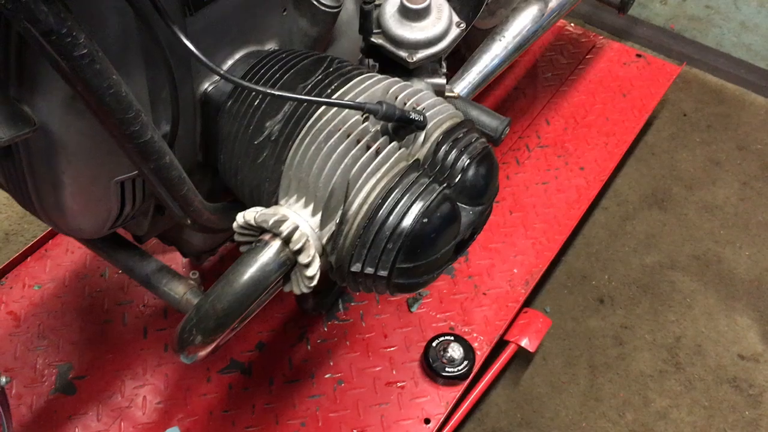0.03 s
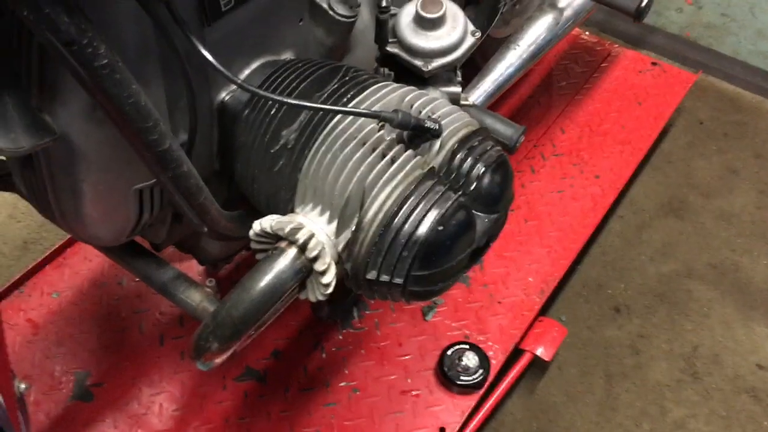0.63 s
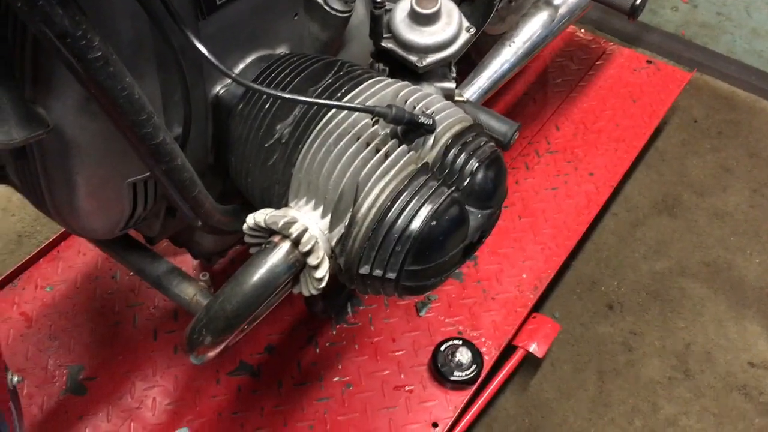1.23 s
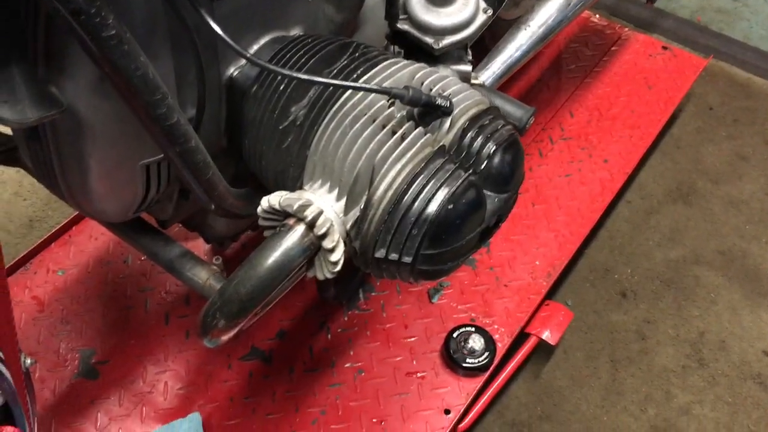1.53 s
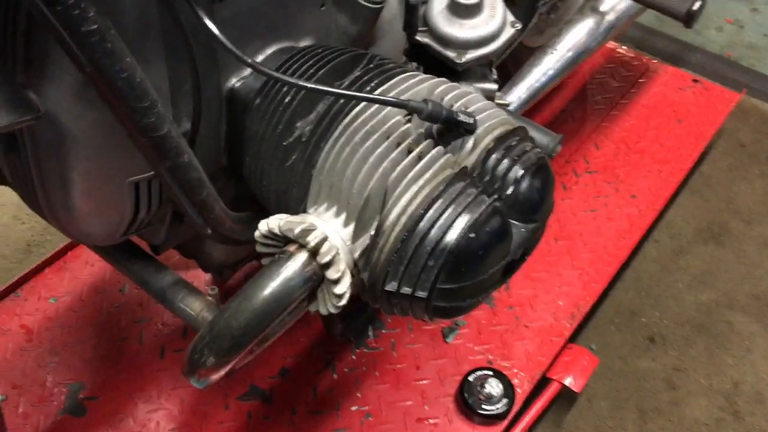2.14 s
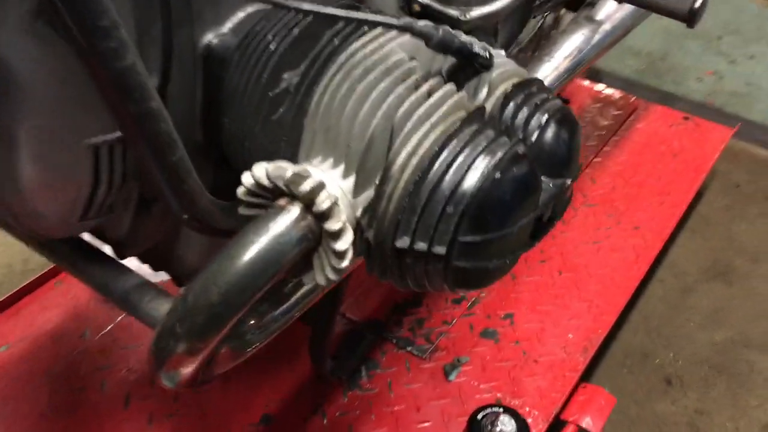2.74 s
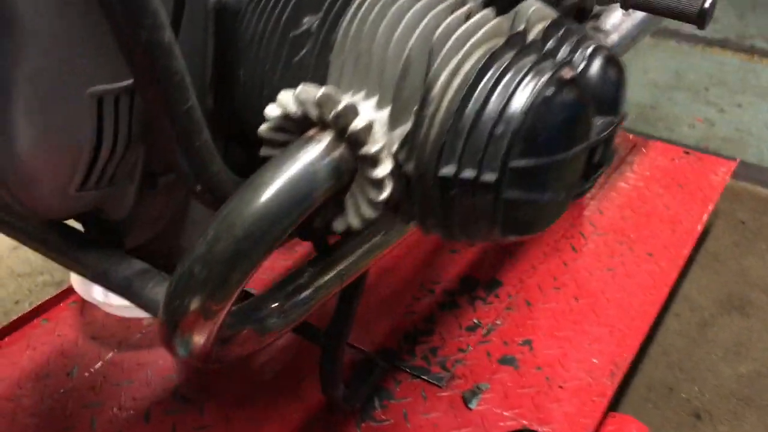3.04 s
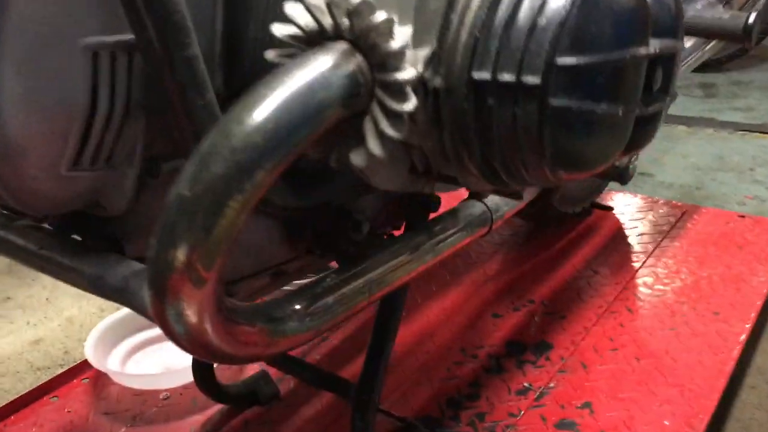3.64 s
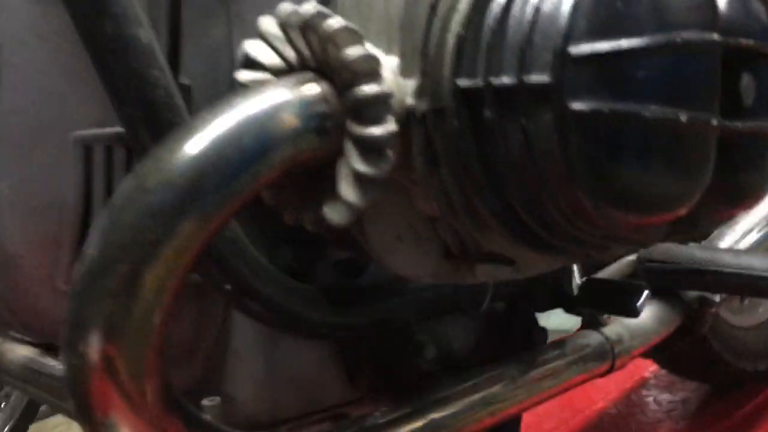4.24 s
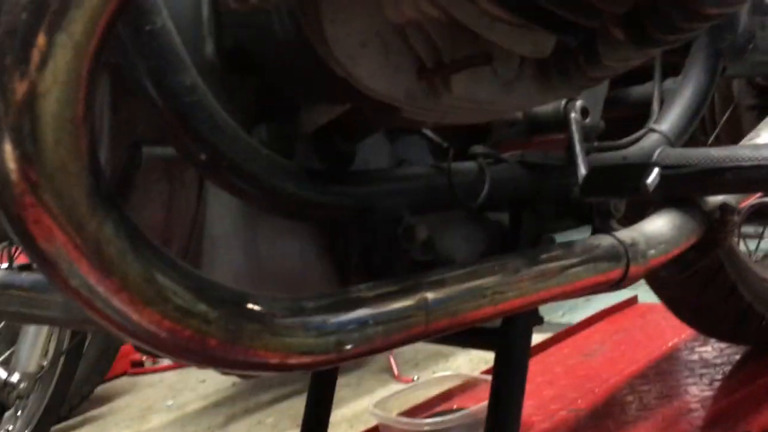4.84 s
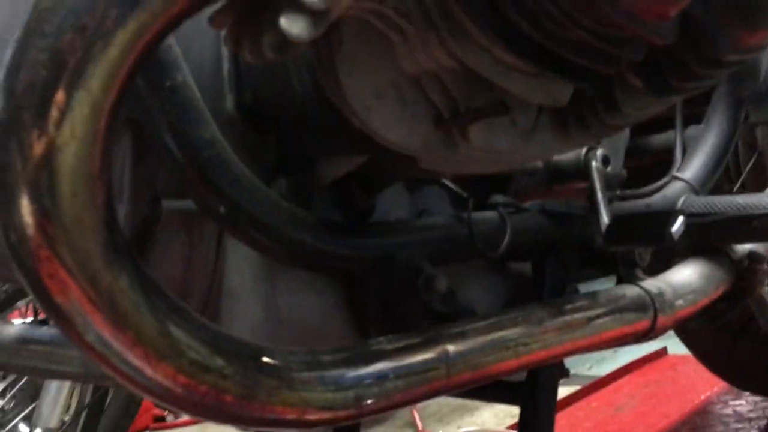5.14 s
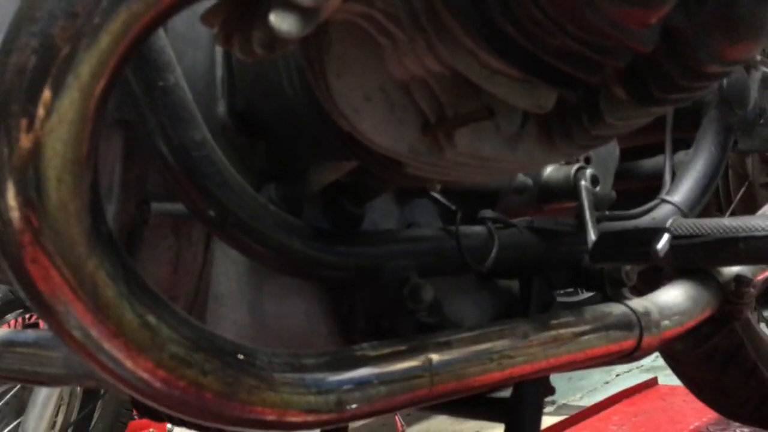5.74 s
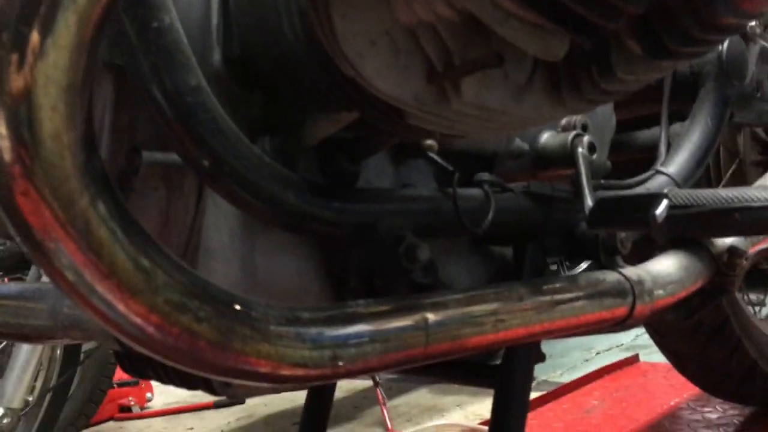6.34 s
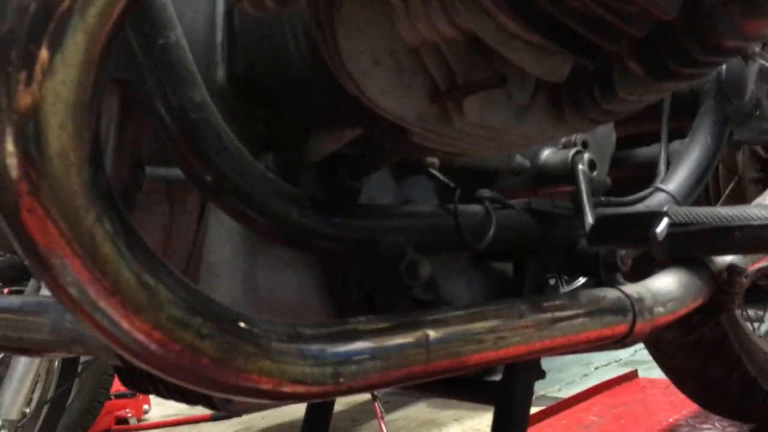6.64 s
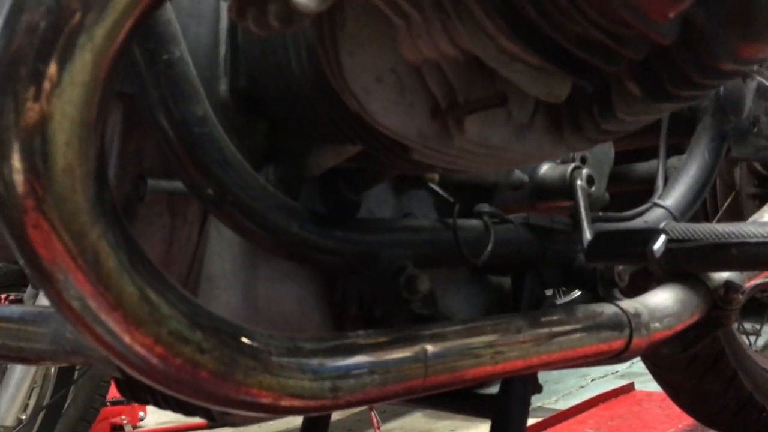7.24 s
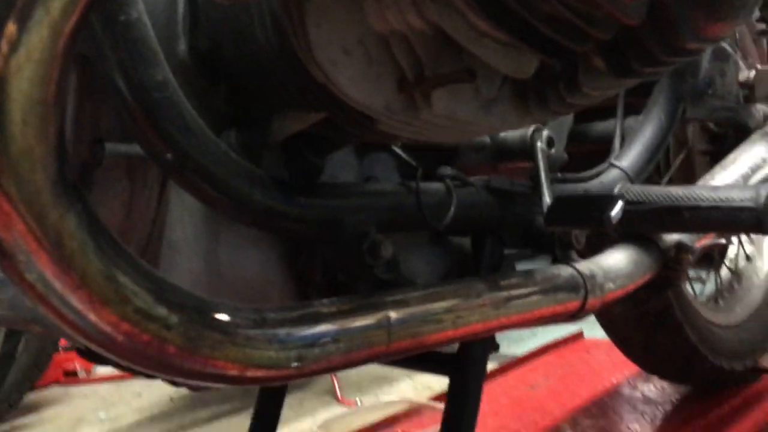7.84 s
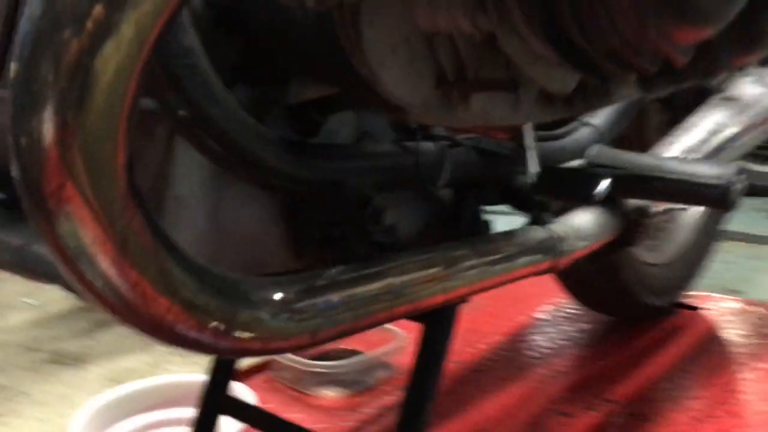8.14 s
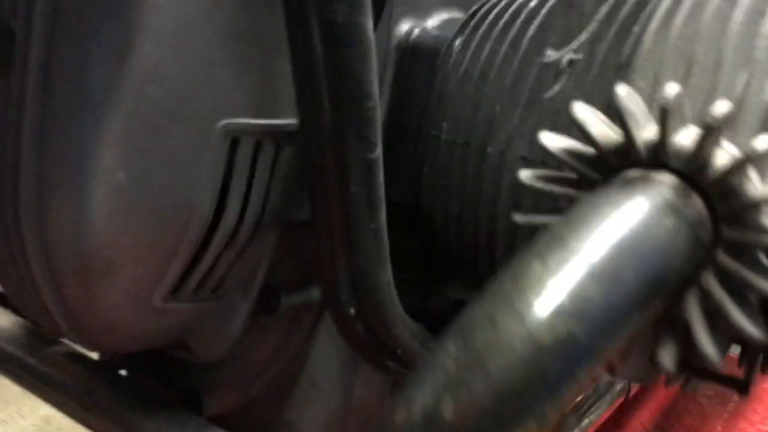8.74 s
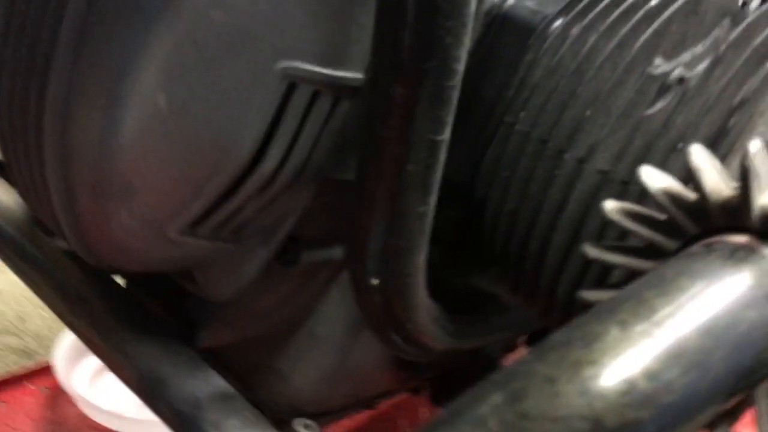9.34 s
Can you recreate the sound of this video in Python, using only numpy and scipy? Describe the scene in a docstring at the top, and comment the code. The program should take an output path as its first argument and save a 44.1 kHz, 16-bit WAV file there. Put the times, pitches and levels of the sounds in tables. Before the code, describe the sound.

A twin-cylinder motorcycle engine is already idling at the start, heard close up in a workshop, and it runs without a break for about nine seconds. A loose tappet gives a sharp steel tick about eleven times a second, each one briefly ringing the cylinder head and valve cover. Underneath are a low, even exhaust throb with soft puttering, short hollow knocks in step with it, a whirr of gears and chain, and a faint hiss of air. The idle speed wavers only slightly and never revs.

Around 3 seconds the microphone moves beside the cylinder, and the ringing changes colour and grows a little louder. From about 4.5 to 8 seconds it sits below, where the exhaust throb is slightly fuller. Near 8.5 seconds it moves to the front, and the metallic ticking and whirr become a bit stronger until the end.

```python
"""A workshop, close to a flat-twin motorcycle idling on a lift; a hand-held microphone moves round one
cylinder: above, beside, below, in front. A loose tappet ticks once in every four-stroke cycle and
rings the finned head; the other tappets are a faint wash. Two firings a cycle throb in the exhaust,
the crankcase knocks in step, and gears and chain whirr underneath."""
import sys
import numpy as np
from scipy import signal
from scipy.fft import rfft, irfft, next_fast_len
from scipy.io import wavfile

SR = 44100
rng = np.random.default_rng(int(sys.argv[2]) if len(sys.argv) > 2 else 0)


def transcribe(u):
    """Save the signal u as a 16-bit wav file named by the first command-line argument.

    u: samples, shape (n,) or (channels, n), limited to [-1, 1]; the rate is SR.
    q: integer samples, one column per channel.
    """
    v = np.clip(np.atleast_2d(u).T, -1, 1)
    q = np.round(v * 32767).astype(np.int16)
    wavfile.write(sys.argv[1], SR, q)


N = 413658
TIME = np.arange(N) / SR
AGE = np.arange(SR // 4) / SR  # seconds since a blow
FFT_SIZE = next_fast_len(N + SR // 2, True)
HZ = np.fft.rfftfreq(FFT_SIZE, 1 / SR)

# microphone path round the cylinder: t/s, position (0 above, 1 beside, 2 below, 3 in front)
MIC_PATH = [(0, 0), (2.6, 0), (3.05, 1), (4.35, 1), (4.7, 2), (8.15, 2), (8.8, 3), (9.38, 3)]


def loose_tappet(head_db, click_db):
    """Once a cycle the rocker slaps its valve: a steel click, the ring of the head, the room's answer."""
    # spectra of the contact, the click and the finned head: f/Hz, relative level/dB
    crack_spectrum = [(3000, -15.5), (7000, -12.5), (8500, 2), (12000, -0.5), (13500, -11), (15800, -6.5)]
    click_spectrum = [(1500, -30), (3800, -6), (6000, -1.5), (7600, -4.5), (8800, -1.5), (11000, -2),
                      (12200, -8), (13000, -5.5), (15800, -11.5)]
    head_spectrum = [(150, -35), (500, -22.5), (1250, 1.5), (1700, 4.5), (2100, 7.5), (2800, 4.5),
                     (3500, 9), (3900, -15.5), (6000, -23)]
    times = crank_times(0)
    db = np.interp(times, TIME, click_db) + 0.5 * rng.standard_normal(len(times))  # no two slaps are equal
    crack = blows(times, db + 6, attack=0.0005, t60=0.025, alike=0.94, scatter_db=0)
    click = blows(times, db + 3.5, attack=0.0021, t60=0.035, alike=0.8, scatter_db=-1.2)
    room = blows(times, db - 6.5, attack=0.00068, t60=0.2, alike=0.86, scatter_db=-1)
    head = blows(times, 0, attack=0.0014, t60=0.054, alike=0.53, scatter_db=1)
    head += blows(times, -4.5, attack=0.011, t60=0.24, alike=0.97, scatter_db=1.5)
    head = amp(head_db - 8.5) * unit(ring(head, shape(head_spectrum)))
    return ring(crack, shape(crack_spectrum)) + ring(click + room, shape(click_spectrum)) + head


def rocker_cover():
    """Every tick sets the valve cover and fins pinging and the steel rocker and valve stem chinking."""
    # modes of cover and rocker: f/Hz, swell/s, peak level/dB from above, beside, below, in front
    cover_modes = [(1768.1, 0.0012, -25.5, -28.5, -23.0, -23.0),
                   (2157.3, 0.0066, -37.5, -36.5, -35.5, -32.5),
                   (2203.6, 0.006, -36.5, -33.0, -36.5, -34.0),
                   (2268.8, 0.0025, -29.0, -23.0, -29.5, -33.0),
                   (2429.9, 0.0068, -34.5, -34.0, -35.5, -32.5),
                   (2651.0, 0.0024, -50.0, -26.0, -23.0, -24.5),
                   (2775.3, 0.0032, -33.5, -29.5, -29.0, -31.5),
                   (2816.1, 0.008, -39.5, -36.0, -34.0, -32.0),
                   (3143.0, 0.0045, -34.0, -27.0, -26.5, -26.0),
                   (3347.3, 0.0046, -26.0, -27.0, -48.0, -20.5),
                   (3438.8, 0.008, -42.5, -35.5, -36.0, -50.0),
                   (3505.5, 0.0022, -29.5, -45.5, -30.0, -50.0),
                   (3586.4, 0.008, -44.0, -43.0, -36.0, -50.0), (3673.6, 0.007, -38.5, -36.5, -48.5, -29.0)]
    rocker_modes = [(4444, 0.0047, -37, -47.5, -37.5, -40), (6350, 0.0037, -38, -35, -37, -35.5),
                    (8320, 0.0019, -48, -33, -33, -29), (8680, 0.0028, -34, -34.5, -45, -36),
                    (9760, 0.0033, -31.5, -32, -43, -31), (10040, 0.0032, -37, -37, -29, -37),
                    (10540, 0.0032, -46, -32, -38, -40), (11100, 0.0033, -31, -33, -35, -38),
                    (11790, 0.002, -46, -30, -37, -28)]
    times = crank_times(0) + 0.0005
    ping = sum(struck(times, hz, swell, mic_db, steep=0.88, scatter_db=1.06, detune=0.0015)
               for hz, swell, *mic_db in cover_modes)
    chink = sum(struck(times, hz, swell, mic_db, steep=0.49, scatter_db=2.5, detune=0.001)
                for hz, swell, *mic_db in rocker_modes)
    return ping + chink


def exhaust(exhaust_db):
    """Two cylinders fire in turn; the pipes pass only low, even multiples of the cycle rate."""
    # boom of the pipes: multiple of the cycle rate, relative level/dB
    harmonics = [(4, -16.5), (6, -3.5), (8, 2.5), (10, -11.5), (12, -26)]
    phase = cycles() + 0.1156  # runs a little ahead of the tick
    boom = -sum(amp(db) * np.cos(2 * np.pi * order * phase) for order, db in harmonics)
    burns = crank_times(0.17)
    burn_db = np.interp(TIME, burns, 0.43 * rng.standard_normal(len(burns)))  # no two cycles burn alike
    return amp(exhaust_db + burn_db) * unit(boom)


def putter():
    """Each cylinder's gas pulse and its echo puff softly in the silencers."""
    # puffs: share of cycle after the tick, f/Hz, swell/s, peak level/dB at the four microphone positions
    puffs = [(0.2174, 146.2, 0.0093, -26.5, -26, -23.5, -25), (0.267, 153, 0.0074, -26, -49.5, -58, -37),
             (0.3793, 210, 0.011, -35, -32, -29.5, -30.5), (0.6673, 182.3, 0.015, -30, -37, -31, -34),
             (0.867, 141.3, 0.008, -27, -22, -18.5, -21.5), (0.9206, 148.5, 0.0058, -24, -27, -21, -29.0)]
    return sum(struck(crank_times(share), hz, swell, mic_db, steep=2.6, scatter_db=0.5, detune=0.0057)
               for share, hz, swell, *mic_db in puffs)


def crankcase():
    """Pistons, gears and chain give short hollow knocks at the same crank angles in every cycle."""
    # knocks: share of cycle after the tick, f/Hz, swell/s, peak level/dB at the four microphone positions
    knocks = [(0.0048, 340, 0.0044, -31, -29, -29.5, -31), (0.0306, 845, 0.009, -41, -40, -34.5, -30),
              (0.0733, 607, 0.0026, -23.5, -26, -21.5, -32), (0.1126, 956, 0.0038, -49, -27, -38, -27),
              (0.184, 1150, 0.0043, -31, -31, -35.5, -36), (0.25, 726.3, 0.0044, -29, -36.0, -35, -36),
              (0.2802, 599, 0.0065, -33, -23.5, -26.5, -23.5),
              (0.2824, 394, 0.0039, -27.5, -30, -32.5, -26.5), (0.4015, 781, 0.016, -43, -29.5, -48, -34),
              (0.4397, 1162, 0.0041, -45, -32.5, -44, -38), (0.5637, 603, 0.0093, -27, -29.5, -35, -31),
              (0.639, 828, 0.0077, -38, -30, -27.5, -26), (0.6386, 525, 0.0057, -27.5, -36.5, -59, -33),
              (0.67, 562.6, 0.0084, -48, -22.5, -28, -21), (0.7161, 495.8, 0.0049, -42, -26, -28.5, -34.0),
              (0.7264, 642, 0.0024, -58, -21, -21, -25), (0.7368, 1135, 0.0043, -32, -22.5, -32.5, -19),
              (0.8424, 547.5, 0.0022, -22, -19, -21.5, -14.5),
              (0.8517, 618, 0.0068, -27.5, -28.5, -27.5, -38), (0.8564, 811, 0.0066, -32, -35, -31.5, -45),
              (0.8844, 1075, 0.0069, -28.5, -38, -32, -45), (0.955, 1172, 0.0032, -27.5, -33.5, -25, -28)]
    return sum(struck(crank_times(share), hz, swell, mic_db, steep=2.56, scatter_db=0.43, detune=0.0021)
               for share, hz, swell, *mic_db in knocks)


def gear_whirr(gears_db):
    """The same gear teeth and chain links mesh in every cycle, so their rush nearly repeats."""
    # rush of gears and chain: f/Hz, relative level/dB
    spectrum = [(20, -47), (60, -11), (200, -1), (265, 2.5), (330, 8.5), (450, 5.5), (600, 7), (800, 5.5),
                (1200, 4), (1600, 1), (2500, -3), (3400, -8), (4500, -15), (9000, -26), (15000, -35)]
    times = crank_times(0)
    cycle_s = np.mean(np.diff(times))
    swell = np.sin(np.pi * np.minimum(AGE / (2 * cycle_s), 1))  # overlapping cycles join evenly
    mesh = place(times, swell * dense_modes(len(times), alike=0.78))
    return amp(gears_db - 4) * ring(mesh, shape(spectrum))


def far_tappets(head_db):
    """The other valves close later in the cycle, hidden by the engine and blurred by the room."""
    # wash of the far tappets: f/Hz, relative level/dB
    spectrum = [(500, 3.5), (1800, 12), (2700, 16), (3500, 12.5), (4000, 5), (7500, -1), (9800, 9.5),
                (11200, 5), (13000, 1.5), (15800, 0)]
    wash = blows(crank_times(0.515), 0, attack=0.0034, t60=0.12, alike=0.95, scatter_db=-1)
    wash += blows(crank_times(0.75), -1.5, attack=0.0011, t60=0.024, alike=0.55, scatter_db=3)
    return amp(head_db - 12) * unit(ring(wash, shape(spectrum)))


def room_tone():
    """Intake air and the diffuse sound of the workshop make a steady hiss."""
    # air and room: f/Hz, relative level/dB
    spectrum = [(20, -8), (45, 13.5), (100, 10.5), (300, -8), (1500, -1.5), (3400, -5), (4000, -6),
                (7500, -10.5), (10000, -11.5), (13000, -22), (15800, -38)]
    return amp(-34) * ring(rng.standard_normal(N), shape(spectrum))


def radiate(metal):
    """Different resonances of fins and covers stand out as the microphone moves round the cylinder."""
    # resonances that radiate towards each position: f/Hz, width/Hz, lift/dB
    above = [(562, 29, 9), (610, 23, 6.5), (710, 19, 5), (1172, 31, 11), (1690, 42, 5.5), (2390, 110, 4),
             (3380, 61, 4), (3560, 130, 4.5), (5090, 66, 6), (5980, 120, 7), (7120, 110, 8),
             (8700, 160, -1), (9900, 290, 4), (11100, 500, 4.5), (14900, 900, 4.5)]
    beside = [(575, 28, 4.1), (773, 23, 6.3), (1120, 71, 9.4), (2170, 70, 3.4), (2450, 270, 3.9),
              (3370, 300, 3), (4040, 40, 4.5), (8900, 560, 3), (11900, 310, 3), (15000, 200, 5)]
    below = [(475, 24.6, 8), (607, 47, 8.5), (690, 44, 3.6), (841, 30, 6.3), (1130, 74, 5.1),
             (1880, 57, 2.8), (2390, 260, 4.1), (2740, 80, 3.8), (3160, 31, 2.7), (3960, 13, 13.5),
             (6160, 61, 2.6), (8560, 280, 2.7), (10100, 95, 4.7), (10800, 630, 2), (14100, 120, 4.6),
             (15000, 96, 4)]
    front = [(600, 55, 5.7), (773, 31, 5), (1187, 29, 7), (2600, 68, 8.1), (3380, 60, 2.5), (3760, 39, 2.8),
             (6600, 82, 3.3), (12100, 71, 4), (14100, 140, 5)]
    position, = curves(MIC_PATH)
    heard = np.zeros(N)
    for k, modes in enumerate([above, beside, below, front]):
        power = 1 + sum((amp(db) ** 2 - 1) / (1 + (2 * (HZ - hz) / width) ** 2) for hz, width, db in modes)
        crossfade = np.maximum(1 - abs(position - k), 0)
        heard += crossfade * ring(metal, np.sqrt(abs(power)))
    return heard


def cycles(first_tick_s=0.1086):
    """Four-stroke cycles run since the first tick, one value per sample: two crank turns each."""
    # idle speed, hunting a little: t/s, crank speed/rpm
    idle = [(0.0, 1326.1), (1.55, 1326.0), (1.7, 1345.4), (2.4, 1340.3), (2.55, 1351.5), (3.0, 1338.1),
            (3.2, 1382.8), (3.75, 1343.4), (4.0, 1367.1), (4.2, 1335.5), (5.6, 1365.5), (6.3, 1342.8),
            (6.45, 1355.0), (7.1, 1329.4), (7.2, 1352.6), (8.05, 1371.4), (8.8, 1349.2), (9.4, 1391.4)]
    rpm, = curves(idle)
    run = np.cumsum(rpm / 60 / 2) / SR
    return run - np.interp(first_tick_s, TIME, run)


def crank_times(share):
    """The moments at which each engine cycle reaches this share of its length."""
    run = cycles()
    marks = np.arange(-1, run[-1]) + share
    return np.interp(marks[marks < run[-1]], run, TIME)


def struck(times, hz, swell, mic_db, steep, scatter_db, detune):
    """One mode rung again and again, never quite alike; its level follows the microphone's position."""
    size, pitch = rng.standard_normal((len(times), 2)).T
    position = np.interp(times, *np.transpose(MIC_PATH))
    power = np.interp(position, np.arange(len(mic_db)), amp(mic_db) ** 2)
    gain = np.sqrt(power) * amp(scatter_db * size)
    age = AGE[:SR // 10]
    envelope = (age / swell * np.exp(1 - age / swell)) ** steep  # peaks after swell seconds
    tones = np.sin(2 * np.pi * hz * (1 + detune * pitch[:, None]) * age)
    return place(times, gain[:, None] * envelope * tones)


def blows(times, db, attack, t60, alike, scatter_db):
    """Repeated blows on the same metal, each swelling and dying away; attack and t60 in seconds."""
    sizes = amp(db + scatter_db * rng.standard_normal(len(times)))
    envelope = (1 - np.exp(-AGE / attack)) * amp(-60 * AGE / t60)
    return place(times, sizes[:, None] * envelope * dense_modes(len(times), alike))


def dense_modes(count, alike, hold=0.985):
    """Countless overlapping modes, a row per blow: the share `alike` drifts slowly, the rest is new."""
    steps, fresh = rng.standard_normal((2, count, len(AGE)))
    steps[1:] *= np.sqrt(1 - hold ** 2)
    pattern = signal.lfilter([1], [1, -hold], steps, axis=0)
    return np.sqrt(alike) * pattern + np.sqrt(1 - alike) * fresh


def place(times, sounds):
    """Add one row of sound at each time."""
    index = np.round(times * SR).astype(int)[:, None] + np.arange(sounds.shape[1])
    inside = (index >= 0) & (index < N)
    return np.bincount(index[inside], sounds[inside], N)


def ring(x, gain):
    """Minimum-phase filter with the given gain: it rings after a blow, never before."""
    cepstrum = irfft(np.log(np.maximum(gain, 1e-6)), FFT_SIZE)
    cepstrum[1:FFT_SIZE // 2] *= 2
    cepstrum[FFT_SIZE // 2 + 1:] = 0
    return irfft(rfft(x, FFT_SIZE) * np.exp(rfft(cepstrum)), FFT_SIZE)[:N]


def shape(points):
    """Gain through (f/Hz, level/dB) points, scaled to leave the power of white noise unchanged."""
    hz, db = np.transpose(points)
    return unit(amp(np.interp(np.log(HZ + 1), np.log(hz), db)))


def curves(rows):
    """One value per sample for each column after the time."""
    times, *columns = np.transpose(rows)
    return [np.interp(TIME, times, column) for column in columns]


def amp(db):
    """Decibels to gain."""
    return 10 ** (np.asarray(db) / 20)


def unit(x):
    """Scale to rms 1."""
    return x / np.sqrt(np.mean(x ** 2) + 1e-20)


def scene():
    """Clatter of engine metal over the exhaust's throb, in mono at close range."""
    # the microphone comes closer: t/s, relative level/dB of exhaust, gears, cylinder head, tappet click
    approach = [(0.2, -20, -30, -31, -25.5), (1.4, -20.5, -30.5, -30.5, -25.5),
                (2.6, -19, -29, -29.5, -24.5), (3.6, -18, -29.5, -27.5, -23), (4.5, -18, -28.5, -27.5, -21),
                (7.3, -17, -27, -28.5, -23), (8.15, -17.5, -27.5, -27.5, -22),
                (8.7, -18, -27.5, -24.5, -21.5), (9.3, -18, -25.5, -24.5, -21)]
    exhaust_db, gears_db, head_db, click_db = curves(approach)
    metal = radiate(loose_tappet(head_db, click_db) + far_tappets(head_db) + gear_whirr(gears_db))
    gas = exhaust(exhaust_db) + putter()
    return (metal + rocker_cover() + crankcase() + gas + room_tone())[None]


def record(dry):
    """The microphone opens after a moment of silence and keeps nothing above its band limit."""
    open_s, top_hz = 0.084, 15900
    spectrum = rfft(dry * (TIME > open_s), FFT_SIZE)
    return irfft(spectrum * (HZ < top_hz), FFT_SIZE)[:, :N]


dry = scene()
out = record(dry)
transcribe(out)
```